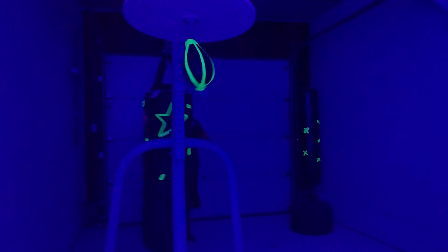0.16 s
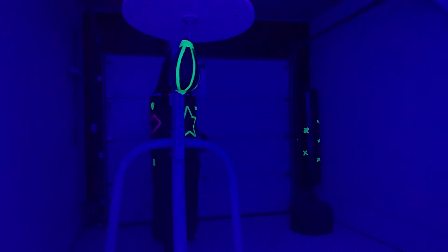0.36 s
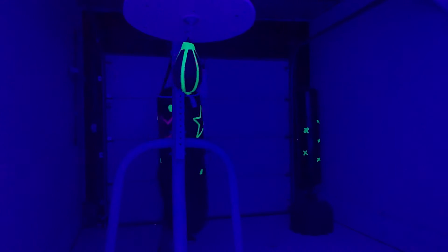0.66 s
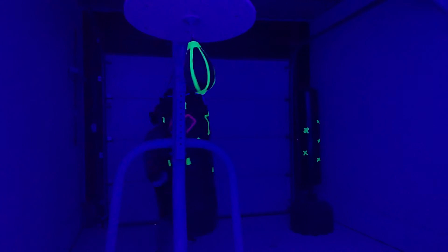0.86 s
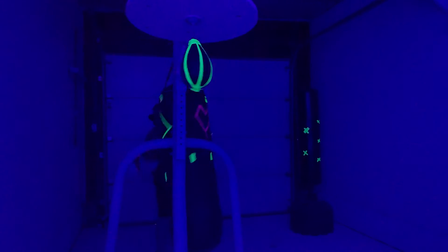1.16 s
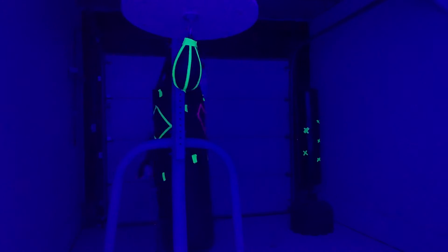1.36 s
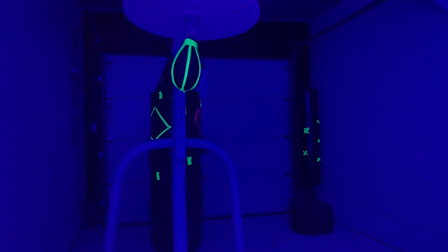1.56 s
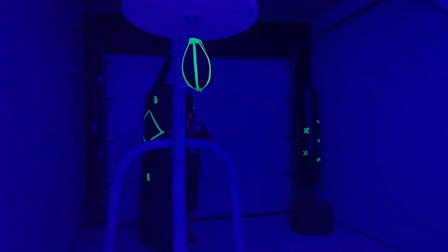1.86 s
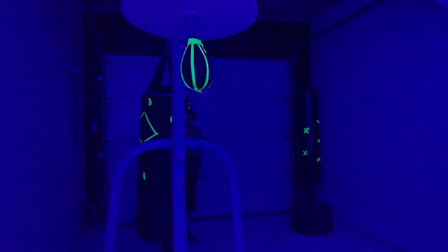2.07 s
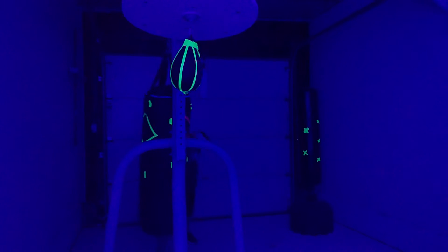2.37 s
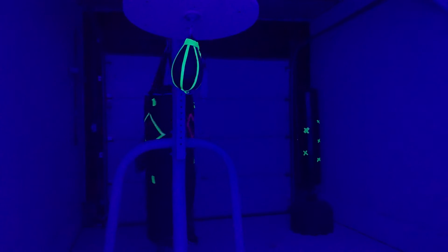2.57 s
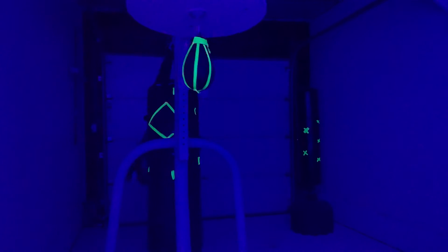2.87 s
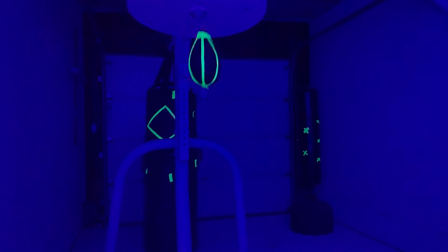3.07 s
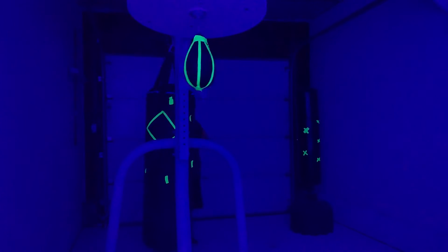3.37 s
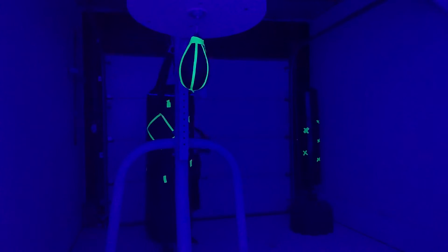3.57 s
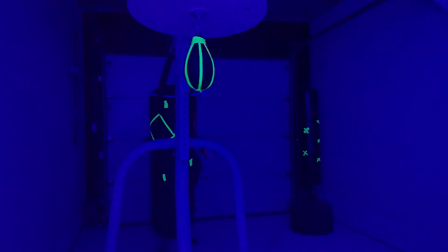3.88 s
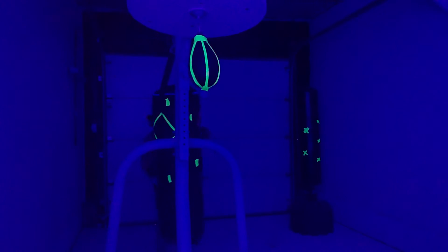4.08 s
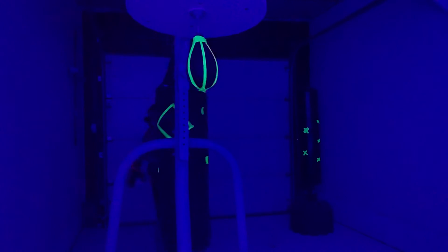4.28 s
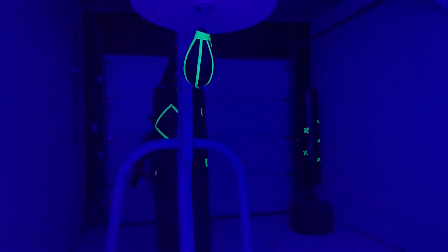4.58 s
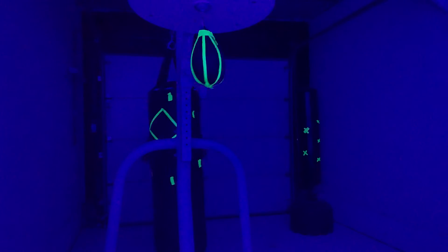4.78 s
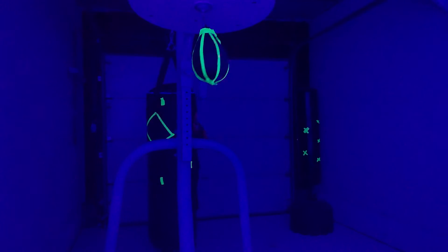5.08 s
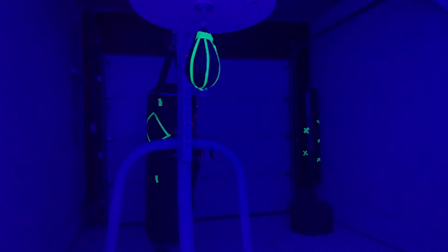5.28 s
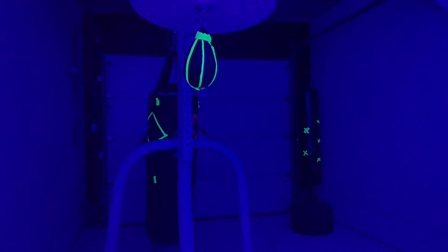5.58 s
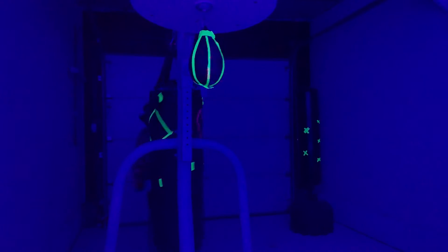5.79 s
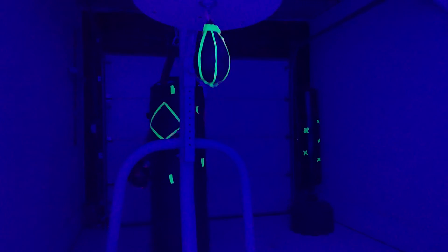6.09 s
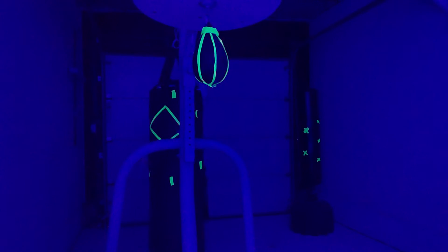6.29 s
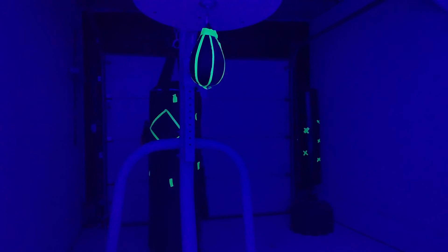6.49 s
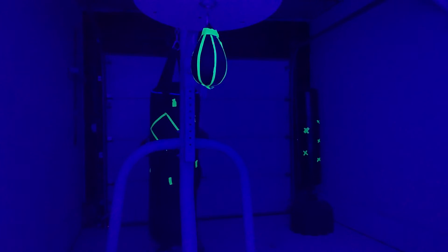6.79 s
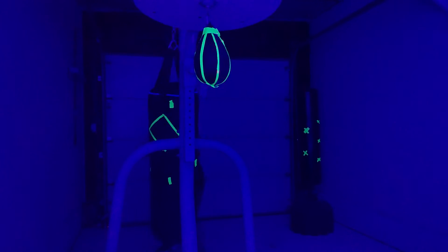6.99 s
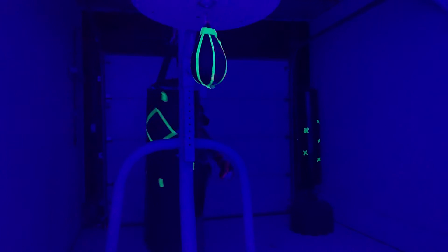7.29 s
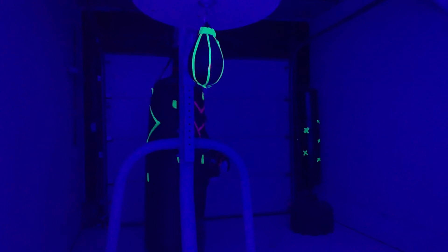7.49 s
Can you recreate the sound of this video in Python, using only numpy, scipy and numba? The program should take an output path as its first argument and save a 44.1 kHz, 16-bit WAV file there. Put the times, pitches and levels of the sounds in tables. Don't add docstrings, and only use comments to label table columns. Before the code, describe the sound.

A heavy bag on a chained steel stand is punched in a bare, reverberant room, heard in stereo from a few metres away over faint steady hiss. It opens with chain rattle, small dry swivel squeaks and floor bumps. Two boomy, padded thuds land at 0.7 and 0.9 s; a loud squeak at 1.05 s leads to a clanging stand crash around 1.3 s, with ringing tubes and several foot knocks. Another pair hits at 2.3 and 2.55 s, then a squeak and a hard steel crack at 2.8 s with dense jangling. Punches at 3.9 and 4.2 s bring overlapping squeaks and the sharpest crash at 4.4 s. Rattle thins out; a light touch at 5.5 s and dull hit at 5.75 s precede a longer, ringing double crash near 6.0-6.1 s. A last pair at 7.0 and 7.2 s, with a soft squeak, ends in thick, loud chain clatter around 7.6 s.

```python
import sys
import numpy as np
from scipy import signal
from scipy.io import wavfile
from scipy.ndimage import uniform_filter1d
from numba import njit

SR = 44100
rng = np.random.default_rng(int(sys.argv[2]) if len(sys.argv) > 2 else 0)


def generate_wav(sig):
    pcm = np.round(np.clip(np.atleast_2d(sig).T, -1, 1) * 32767).astype(np.int16)
    wavfile.write(sys.argv[1], SR, pcm)


def gain_from_db(level_db):
    decades = np.asarray(level_db, float) / 20
    return 10 ** decades


N = 336924

# (frequency [Hz], density [dB per Hz])
MURMUR = [(60, 0), (120, 7), (250, 2), (500, 10.5), (900, -22), (2500, -14), (7000, -30), (15000, -25)]
# (band centre [Hz], t60 [s], side share [ratio to mid])
ROOM_BANDS = [(69.4, 0.48, .03), (128, 0.34, 0.16), (250, 0.88, 0.25), (500, 0.88, 0.41), (1000, 0.88, 1.),
              (2000, 0.86, 0.95), (4230, 0.88, 0.95), (8000, 0.76, 1), (12770, 0.44, 0.97)]
# (delay [s], level [dB])
WALL_ECHOES = [
    (0, 0),
    (.0145, -2.5),
    (.034, -11),
    (.056, -10),
    (.08, -16),
]
# (time [s], level [dB])
FLOOR_DRUMMING = [(0.0, -48), (1.04, -48), (1.3, -42), (2.34, -54), (2.72, -46), (2.81, -38), (3.62, -54),
                  (4.09, -53), (4.34, -45), (5.13, -63), (5.68, -65), (5.91, -38), (6.28, -44), (6.66, -52),
                  (7.3, -50), (7.64, -48)]
# (time [s], level [dB], pitch [Hz])
FOOT_BUMPS = [(0.0, -23.5, 172), (.25, -28, 162), (.387, -27, 173), (1.098, -20, 185), (1.139, -26.5, 322),
              (1.27, -25, 282), (1.341, -20, 94), (1.4, -20, 337), (1.475, -18.5, 154), (1.682, -20.5, 150),
              (1.988, -28.5, 156), (2.498, -31, 152), (2.839, -21.5, 279), (2.928, -19.5, 161),
              (3.02, -20, 314), (3.12, -20.5, 164), (3.199, -28, 94), (3.299, -32, 156),
              (4.415, -19.5, 290), (4.479, -20, 214), (4.559, -35, 274), (5.985, -24, 250),
              (6.063, -19.5, 80.6), (6.135, -18.5, 252), (6.219, -24.5, 205), (6.309, -33, 300),
              (7.549, -25, 83.5), (7.6, -28, 81)]
# (time [s], pitch
# [Hz], level [dB], t60 [s])
TUBE_RINGS = [(.612, 2015, -21, .1), (1.29, 2350, -15.5, 0.17), (1.32, 3010, -18, 0.18),
              (1.34, 2000, -23, .2), (1.31, 1139, -13, 0.3), (1.35, 927, -17, 0.42),
              (1.52, 1390, -20.5, 0.22), (1.71, 2400, -31, .2), (2.2, 2060, -24, .12),
              (2.22, 1043, -29, 0.15), (2.837, 957, -12, 0.46), (2.87, 1870, -8, 0.087),
              (4.27, 3140, -22, .35), (4.42, 976, -16, 0.35), (4.431, 2350, -11, 0.16),
              (4.43, 1040, -15, 0.58), (4.43, 942, -14.5, 0.58), (5.93, 2200, -22.5, 0.23),
              (5.996, 1176, -16.5, 0.15), (6.101, 1382, -11, 0.38), (6.161, 1142, -19.5, 0.51),
              (6.3, 940, -21.5, 0.22), (7.218, 936, -20, 0.19), (7.33, 500, -25, 0.14),
              (7.55, 1597, -17, 0.18), (7.59, 960, -18, .5)]
# (time [s], length [s], slip rate [Hz], level [dB], brightening [dB per multiple])
SWIVEL_SQUEAKS = [
    (0.084, 0.06, 790, -26, -0.5),
    (0.179, 0.044, 785, -34, 0),
    (.25, 0.038, 780, -30, -0.5),
    (1.045, 0.062, 785, -20, -.5),
    (1.163, 0.069, 815, -25, -1),
    (2.647, .12, 790, -24.5, -1),
    (4.252, 0.063, 785, -25, 0),
    (4.269, 0.066, 785, -31, 0.5),
    (4.331, 0.12, 774, -26, -2.5),
    (7.05, 0.11, 785, -28, -1.5),
]
SQUEAK_MULTIPLES = [-12.5, 3.5, -3, -5, -10, -16, -9]
# (time [s], centre [Hz], width [Hz], level [dB], t60 [s])
STEEL_CRACKS = [
    (1.267, 2200, 1400, -15, 0.2),
    (2.018, 3130, 3000, -27, 0.12),
    (2.831, 2480, 1000, -5, 0.038),
    (2.875, 8000, 3000, -18, 0.024),
    (4.411, 2630, 800, -2.5, 0.032),
    (4.415, 7340, 1500, -16, 0.015),
    (5.992, 1880, 1600, -13, 0.086),
    (6.1, 6500, 1510, -20.5, 0.12),
    (7.59, 6800, 1200, -14.5, .05),
    (7.62, 6760, 1200, -15, .05),
]
# (centre [Hz], width [Hz], level [dB])
STAND_MODES = [(796, 1280, 16), (500, 130, -9), (960, 116, -8.5), (1160, 510, 4.5)]
LINK_MODES = [(2200, 2100, 11), (4300, 2940, 2), (1390, 190, -22.5), (2147, 190, -8), (2350, 140, -17.5),
              (3000, 360, -22)]
JINGLE_MODES = [(7150, 10600, 4), (13450, 14000, 0.5), (6800, 820, -7.5)]
# (time [s], links level [dB], jingle minus links [dB], fall t60 [s])
CHAIN_SNAPS = [(0.429, -20, -0.5, 0.14), (.598, -17, 1, .15), (0.836, -16.5, 0, 0.11),
               (1.048, -17.5, -3.5, 0.39), (1.168, -17.5, -10, 0.41), (2.019, -18, 3.5, 0.16),
               (2.507, -17.5, -11, 0.13), (2.87, -8, -2, 0.18), (3.647, -23.5, -6, 0.14),
               (4.009, -18, -0.5, 0.12), (5.07, -29, -1, 0.21), (5.685, -34, -8, 0.24),
               (6.437, -20.5, -13, 0.18), (6.611, -21, -4.5, .24), (6.843, -17, -9, .12),
               (7.039, -15, -2.5, 0.24), (7.299, -15.5, -9, 0.26), (7.592, -9.5, -8, 0.23)]
# (time [s], links level [dB], jingle minus links [dB], fall t60 [s])
CHAIN_SWAYS = [(.089, -14.5, -5.5, 0.28), (.264, -11, -11, 0.17), (0.554, -17, -12, .2),
               (1.469, -20.5, -5.5, 0.81), (1.797, -25.5, 2.5, 0.5), (2.164, -24, -8, 0.74),
               (2.659, -17.5, -6, 0.48), (2.788, -11, -6, 0.17), (3.099, -24, -2.5, 0.85),
               (3.419, -25, -5, 0.78), (3.819, -30, -20, 0.2), (4.223, -13.5, -3.5, 0.38),
               (4.797, -19.5, -5, 0.25), (5.259, -26, -8.5, .28), (5.369, -32, 1.5, 0.23),
               (5.856, -19, -4, 0.84), (6.309, -17.5, -2, 0.57), (7.119, -17.5, -6, 0.53),
               (7.349, -16, -7, 0.28), (7.489, -18, -5.5, 0.42), (7.552, -9.5, -10.5, .32),
               (7.619, -6.5, -10, .25)]
# (time [s], links level [dB], stand minus links [dB], fall t60 [s])
STAND_CRASHES = [(0.0, -14, -0.5, 0.18), (1.267, -11.5, 5.5, 0.11), (1.297, -13.5, 9, 0.13),
                 (1.349, -20.5, 11, 0.28), (1.569, -25, 1.5, .2), (1.68, -22.5, -1.5, 0.59),
                 (2.019, -25, 8, 0.13), (2.164, -32, 3, 0.57), (3.647, -31, 4, 0.18),
                 (3.819, -34.5, 2, 0.21), (2.833, -6, 4.5, .12), (2.931, -17, 8, 0.29),
                 (3.247, -30, 9, 0.077), (4.412, -3.5, -3, 0.12), (4.459, -13, 2, .27),
                 (5.996, -15.5, 5, 0.42), (6.088, -9, 0, 0.29), (6.169, -18, 0.5, 0.4)]
# (pitch [Hz], level [dB], t60 [s])
BAG_MODES = [(66, -14.5, 0.14), (94, 3, 0.071), (144, -1, 0.057), (213, -2, .045)]
# (time [s], level [dB], leather slap minus level [dB], chain shaken level [dB])
PUNCHES = [
    (0.7095, -23.5, -12, -23),
    (0.9324, -20.5, -9, -19.5),
    (2.3352, -24.5, -12.5, -19.5),
    (2.555, -21.5, -10.5, -17),
    (3.944, -27.5, -10.5, -28.5),
    (4.155, -22.5, -10.5, -22),
    (5.5173, -32.5, -12.5, -36.5),
    (5.75, -23, -15, -27),
    (6.973, -25, -9.5, -27.5),
    (7.219, -24, -13, -16),
]

SWING_S, SWING_PLACES = 1.6, 8
TAIL_S, EARLY_DB, EARLY_T60_S = 0.62, -9, 0.017
BOOM_IN_ROOM_DB, LEFT_MINUS_RIGHT_DB = -12, -0.86
DENT_S = 0.012
SNAP_RISE_S, SWAY_RISE_S, CRASH_RISE_S = 0.008, 0.024, 0.011
SNAP_STAND_DB, SWAY_STAND_DB, CRASH_JINGLE_DB = -6.5, -7.5, -7
PUNCH_STAND_DB, PUNCH_JINGLE_DB = -7.5, -3
PUNCH_RISE_S, PUNCH_FALL_S, PUNCH_LAG_S = 0.014, 0.34, 0.0085
JINGLE_FALL_SHARE = 0.81


@njit
def svf(x, hz, width):
    y, b, l = np.empty(len(x)), 0., 0.
    g, k = np.tan(np.pi * hz / SR), width / hz
    for i in range(len(x)):
        v = (b + g * (x[i] - l)) / (1 + g * (g + k))
        b, l, y[i] = 2 * v - b, l + 2 * g * v, k * v
    return y


def band(x, hz, width, second_width):
    return svf(svf(x, float(hz), float(width)), float(hz), float(second_width))


def unit(x):
    return x / np.sqrt(np.mean(x ** 2))


def add(track, s, sound):
    i = int(max(s, 0) * SR)
    track[i:i + len(sound)] += sound[:N - i]


def fade(seconds, t60):
    t = np.arange(int(seconds * SR)) / SR
    return t, 1000. ** (-t / max(t60, 0.005))


def walk(rate):
    k = int(SR / rate)
    steps = np.repeat(rng.standard_normal(N // k + 1), k)
    return unit(uniform_filter1d(steps, size=k)[:N])


def waver(size, smooth_s):
    noise = rng.standard_normal(size + 4096)
    return unit(uniform_filter1d(noise, size=int(smooth_s * SR)))[:size]


def wide_noise(size, gain):
    out = 0
    for hz, t60, side in ROOM_BANDS:
        mid = band(rng.standard_normal(size), hz, 1.224 * hz, 1.224 * hz)
        diff = band(rng.standard_normal(size), hz, 1.224 * hz, 1.224 * hz)
        stereo = mid + side * diff * np.array([[1], [-1]])
        out = out + gain(hz, t60) * stereo / np.hypot(1, side)
    return out


def building_murmur():
    hz, db = np.transpose(MURMUR)

    def colour(f, t60):
        return gain_from_db(np.interp(np.log(f), np.log(hz), db))
    return gain_from_db(-48) * unit(wide_noise(N, colour))


def room(x):
    def tail(hz, t60):
        t, late = fade(TAIL_S, t60)
        early = gain_from_db(EARLY_DB) * fade(TAIL_S, EARLY_T60_S)[1] / np.sqrt(EARLY_T60_S)
        late = np.minimum(t / 0.0043, 1) * late / np.sqrt(t60)
        return (early + late) / np.sqrt(SR / 14)

    place = SWING_PLACES * np.arange(N) / SR / SWING_S % SWING_PLACES
    out = 0
    for k in range(SWING_PLACES):
        distance = np.abs((place - k + 2) % SWING_PLACES - 2)
        share = np.clip(1 - distance, 0, 1)
        echoes = wide_noise(int(TAIL_S * SR), tail)
        out = out + signal.fftconvolve((np.sqrt(share) * x)[None], echoes, axes=1)[:, :N]
    return out


def floor_drumming():
    s, db = np.transpose(FLOOR_DRUMMING)
    drum = band(rng.standard_normal(N), 66, 21, 35)
    return gain_from_db(np.interp(np.arange(N) / SR, s, db)) * unit(drum)


def foot_bumps():
    out = np.zeros(N)
    for s, db, hz in FOOT_BUMPS:
        t, decay = fade(0.32, 0.09)
        phase = 2 * np.pi * hz * t + 1.1 * waver(len(t), 0.0124)
        add(out, s, gain_from_db(db + 2.5) * np.minimum(t / 0.0067, 1) * decay * np.sin(phase))
    return out


def swivel_squeaks():
    out = np.zeros(N)
    for s, length, hz, db, bright_db in SWIVEL_SQUEAKS:
        t = np.arange(int(0.2 * SR)) / SR
        slip_rate = hz * (1 + 0.006 * waver(len(t), 0.011))
        phase = 2 * np.pi * np.cumsum(slip_rate) / SR
        tone = 0
        for k, multiple_db in enumerate(SQUEAK_MULTIPLES):
            tone = tone + gain_from_db(multiple_db + k * bright_db) * np.sin((k + 1) * phase)
        swell = np.abs(np.sin(np.pi * np.minimum(t / length, 1))) ** 0.49
        flutter_db = 4.5 * waver(len(t), 0.0047)
        add(out, s, gain_from_db(db + flutter_db) * swell * tone)
    return out


def tube_rings():
    out = np.zeros(N)
    for s, hz, db, t60 in TUBE_RINGS:
        t, decay = fade(0.87, t60)
        phase = 2 * np.pi * hz * t + 0.65 * waver(len(t), 0.02)
        add(out, s, gain_from_db(db) * decay * (np.sin(phase) + 0.55 * np.sin(1.1 * phase)))
    return out


def steel_cracks():
    out = np.zeros((2, N))
    for s, hz, width, db, t60 in STEEL_CRACKS:
        decay = fade(0.14, t60)[1]
        for side in out:
            noise = unit(band(rng.standard_normal(len(decay)), hz, width, 0.78 * width))
            add(side, s, gain_from_db(db) * decay * noise)
    return out


def clatter(modes, per_second, scatter_db):
    when = rng.random(N) < per_second / SR
    size = rng.exponential(size=N)
    hits = when * gain_from_db(scatter_db * np.minimum(size, 3)) * rng.standard_normal(N)
    out = 0
    for hz, width, db in modes:
        wander_db = 2.5 * walk(9) if width < hz / 3 else 0
        out = out + gain_from_db(db + wander_db) * unit(band(hits, hz, 1.69 * width, 1.69 * width))
    return unit(out)


def chain_and_stand():
    # (time [s], links level [dB], stand minus links [dB], jingle minus links [dB], rise [s], t60 [s])
    jerks = []
    for s, db, jingle_db, t60 in CHAIN_SNAPS:
        jerks.append((s, db, SNAP_STAND_DB, jingle_db, SNAP_RISE_S, t60))
    for s, db, jingle_db, t60 in CHAIN_SWAYS:
        jerks.append((s, db, SWAY_STAND_DB, jingle_db, SWAY_RISE_S, t60))
    for s, db, stand_db, t60 in STAND_CRASHES:
        jerks.append((s, db, stand_db, CRASH_JINGLE_DB, CRASH_RISE_S, t60))
    for s, _, _, db in PUNCHES:
        jerks.append((s + PUNCH_LAG_S, db, PUNCH_STAND_DB, PUNCH_JINGLE_DB, PUNCH_RISE_S, PUNCH_FALL_S))

    stand, links, jingle = power = np.zeros((3, N))
    for s, db, stand_db, jingle_db, rise, t60 in jerks:
        t, decay = fade(0.7, t60)
        for part, part_db, slowness, fall in ((stand, db + stand_db, 1.3, 1), (links, db, 1.1, 1),
                                              (jingle, db + jingle_db, 0.6, JINGLE_FALL_SHARE)):
            shape = np.minimum(t / (slowness * rise), 1) * decay ** (1 / fall)
            add(part, s - 0.66 * rise, gain_from_db(2 * part_db) * shape ** 2)
    parts = clatter(STAND_MODES, 2000, 2.4), clatter(LINK_MODES, 4000, 2.4), clatter(JINGLE_MODES, 5000, 2.2)
    return np.sum(np.sqrt(power) * parts, axis=0)


def punches():
    boom, slap = np.zeros(N), np.zeros(N)
    for s, db, slap_db, _ in PUNCHES:
        for hz, mode_db, t60 in BAG_MODES:
            t, decay = fade(0.4, t60)
            push = np.minimum(t / 0.0075, 1)
            level = gain_from_db(db + mode_db + 7 + 0.78 * rng.standard_normal())
            add(boom, s, -level * push * decay * np.cos(2 * np.pi * hz * (t - DENT_S)))
        add(slap, s, gain_from_db(db + slap_db + 12) * fade(0.2, 0.18)[1])
    boom = sum(gain_from_db(echo_db) * np.roll(boom, int(late * SR)) for late, echo_db in WALL_ECHOES)
    return boom, slap * unit(svf(rng.standard_normal(N), 325.0, 380.0))


def scene():
    bumps, squeak, crack = foot_bumps(), swivel_squeaks(), steel_cracks()
    boom, slap = punches()
    metal = chain_and_stand() + tube_rings() + gain_from_db(-4.5) * squeak + gain_from_db(3.5) * crack[0]
    walls = room(gain_from_db(BOOM_IN_ROOM_DB) * boom + slap + gain_from_db(1.5) * bumps + metal)
    straight = crack + gain_from_db(-7) * squeak
    through_floor = boom + gain_from_db(-3) * bumps + floor_drumming()
    heard = building_murmur() + walls + straight + through_floor
    return heard * gain_from_db(np.array([[0.5], [-0.5]]) * LEFT_MINUS_RIGHT_DB)


def band_limit(x):
    return signal.sosfilt(signal.butter(12, 16220, fs=SR, output="sos"), x)


def record(dry):
    rounded = np.tanh(0.82 * dry) / 0.8
    top_cut = signal.ellip(8, 0.1, 70, 16150, fs=SR, output="sos")
    mix = signal.sosfilt(top_cut, rounded)
    return band_limit(mix)


dry = scene()
out = record(dry)
generate_wav(out)
```